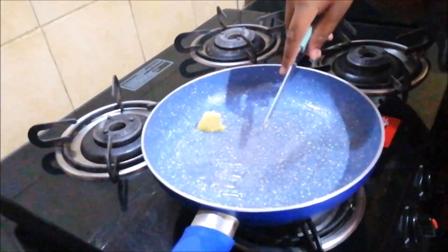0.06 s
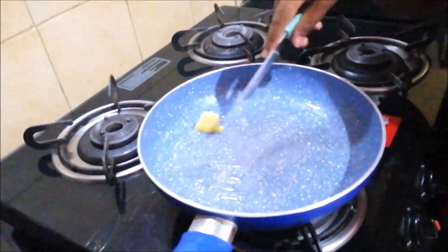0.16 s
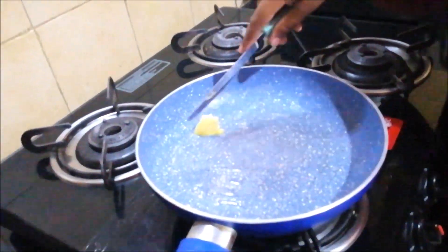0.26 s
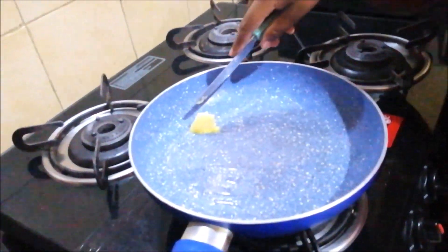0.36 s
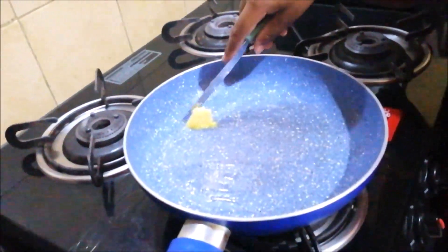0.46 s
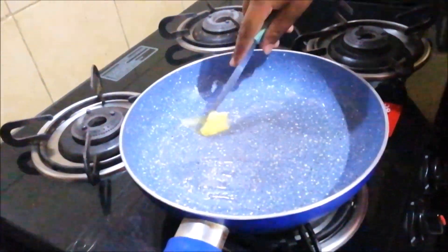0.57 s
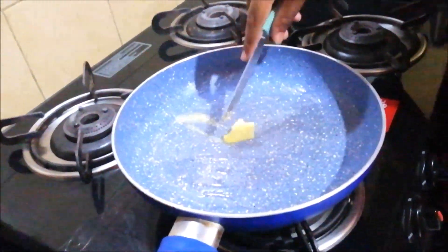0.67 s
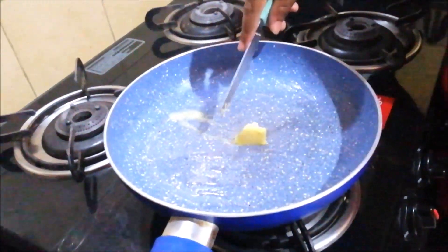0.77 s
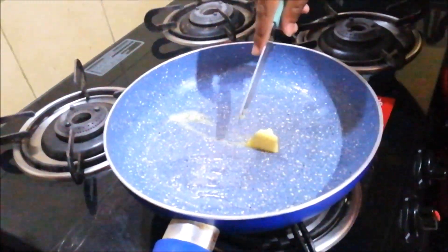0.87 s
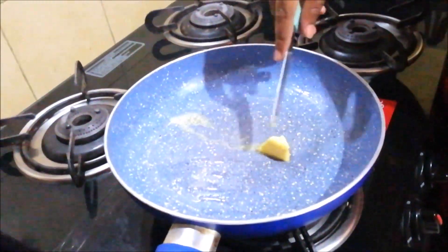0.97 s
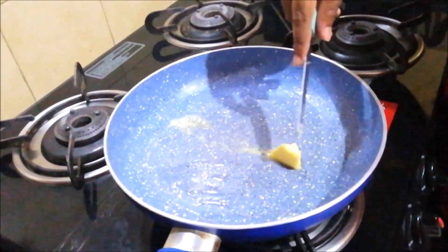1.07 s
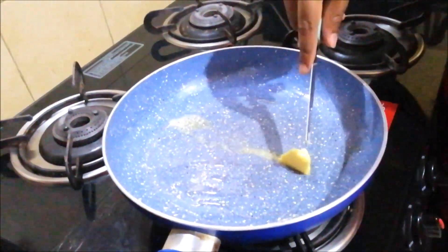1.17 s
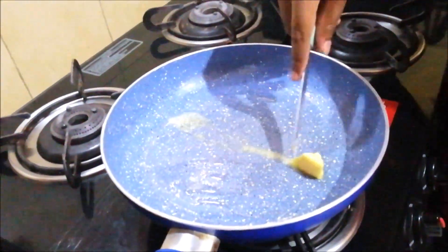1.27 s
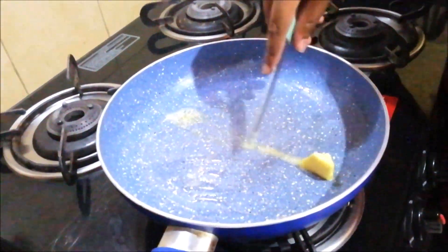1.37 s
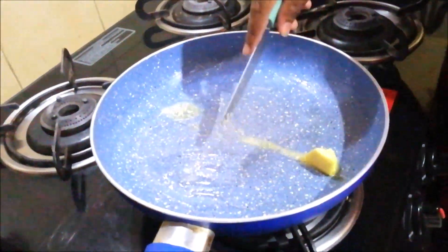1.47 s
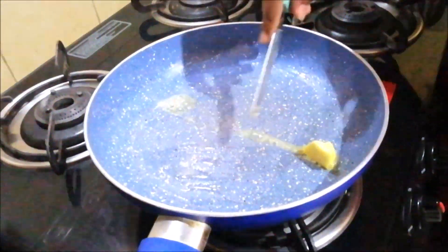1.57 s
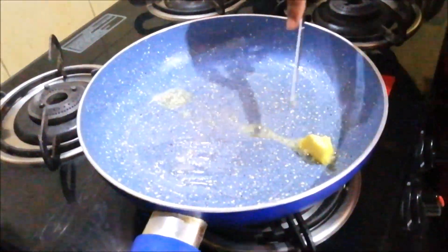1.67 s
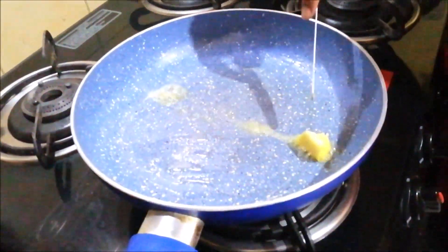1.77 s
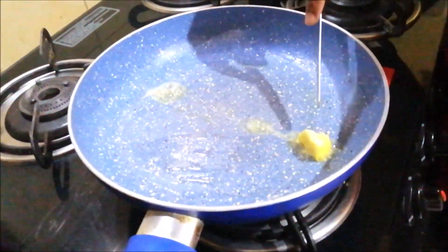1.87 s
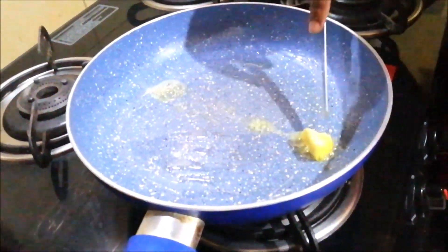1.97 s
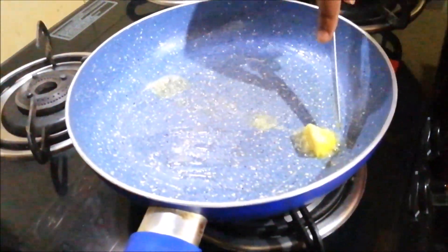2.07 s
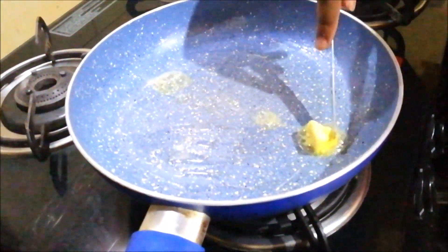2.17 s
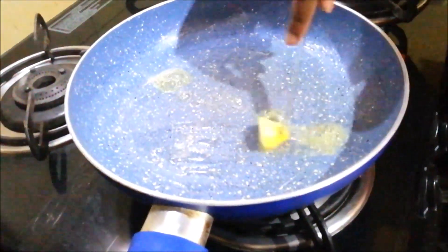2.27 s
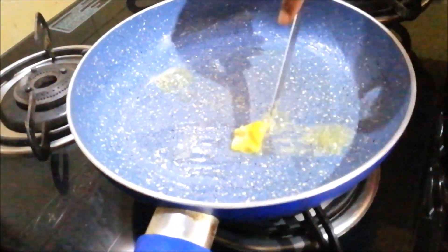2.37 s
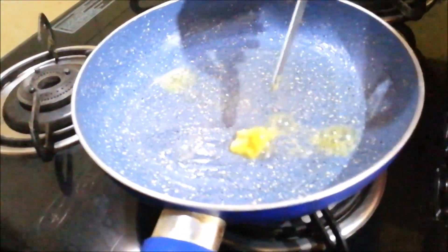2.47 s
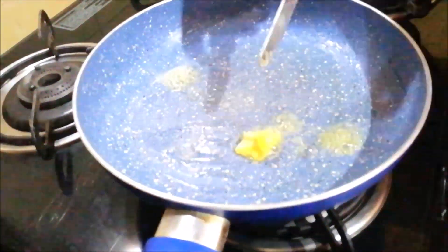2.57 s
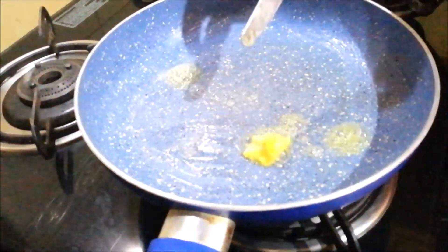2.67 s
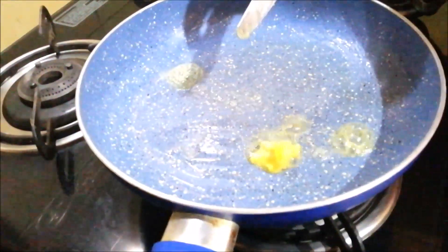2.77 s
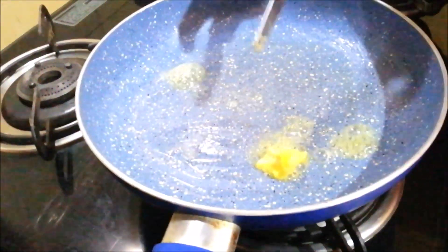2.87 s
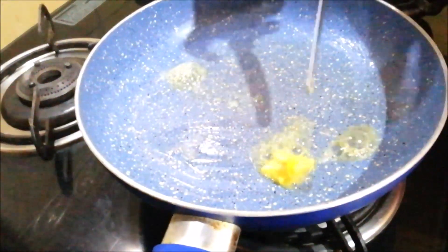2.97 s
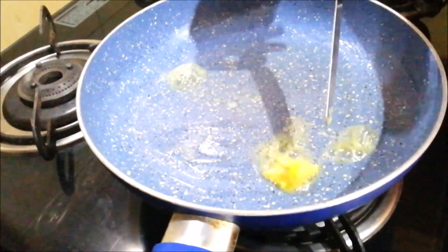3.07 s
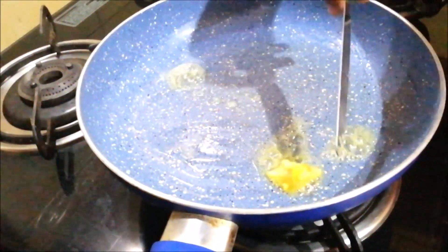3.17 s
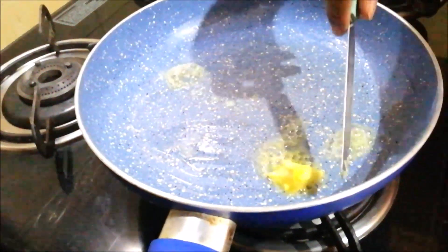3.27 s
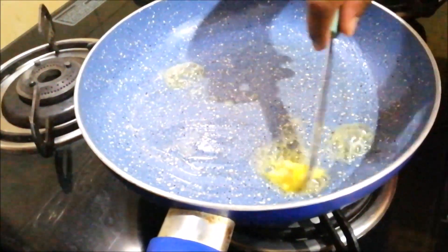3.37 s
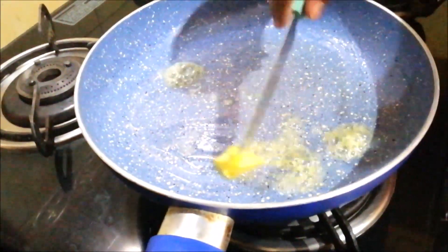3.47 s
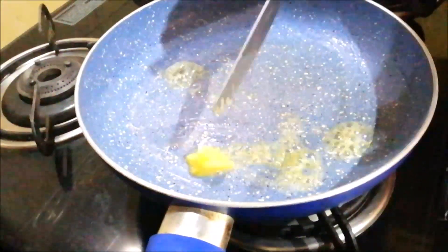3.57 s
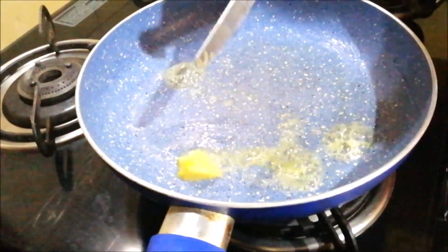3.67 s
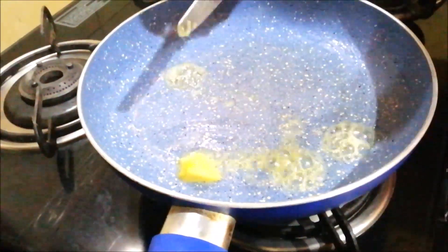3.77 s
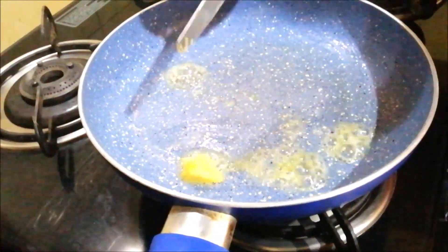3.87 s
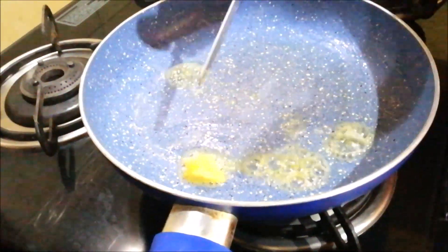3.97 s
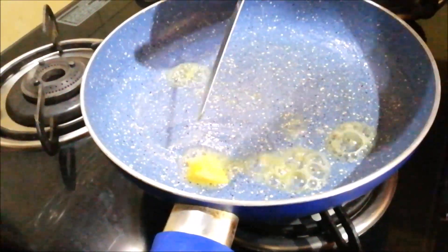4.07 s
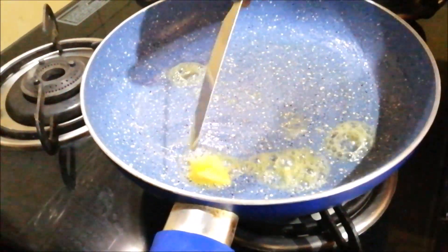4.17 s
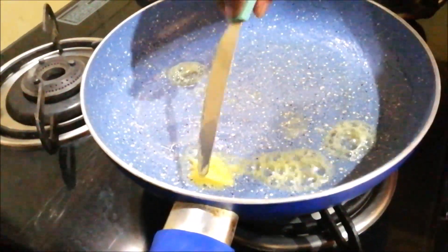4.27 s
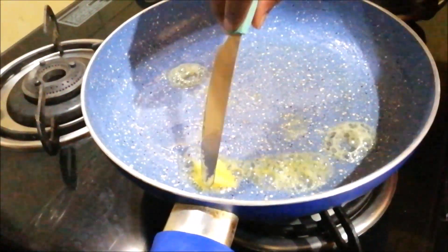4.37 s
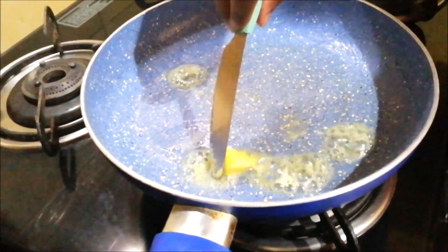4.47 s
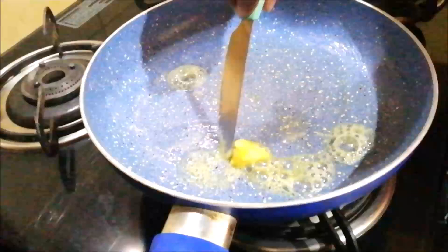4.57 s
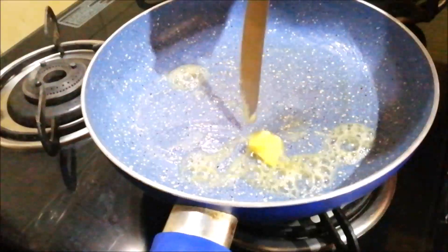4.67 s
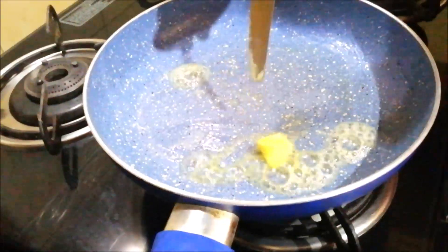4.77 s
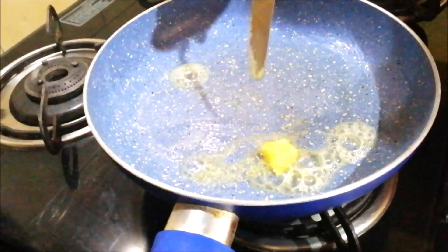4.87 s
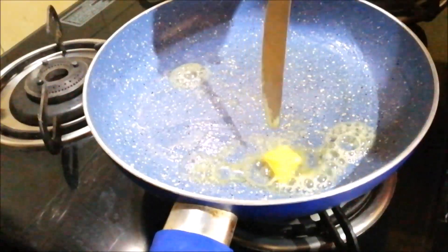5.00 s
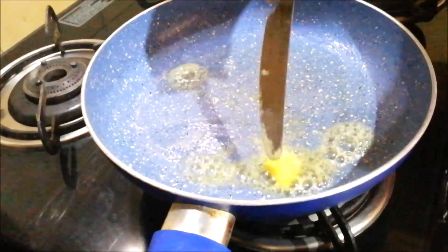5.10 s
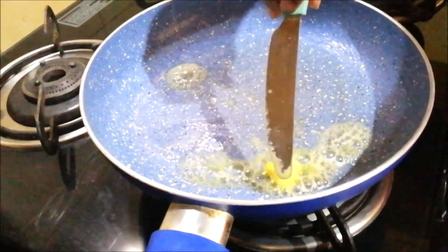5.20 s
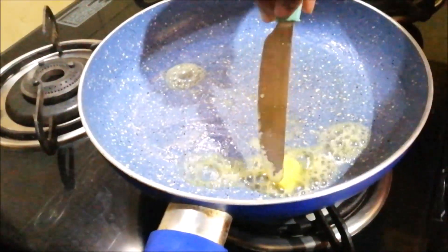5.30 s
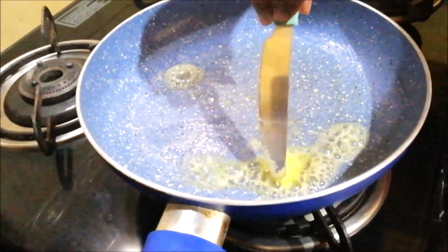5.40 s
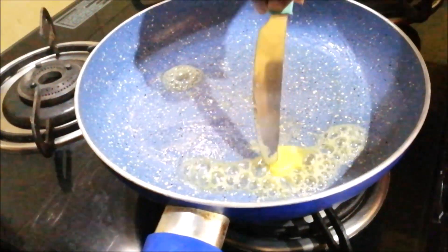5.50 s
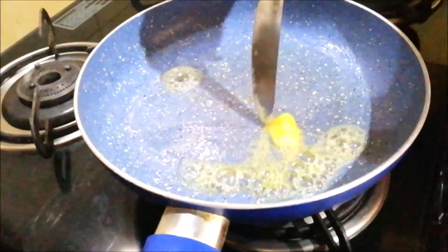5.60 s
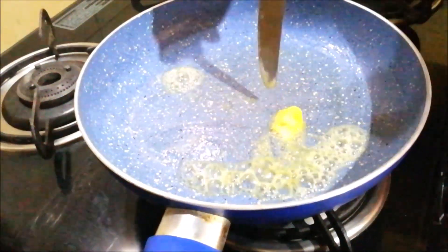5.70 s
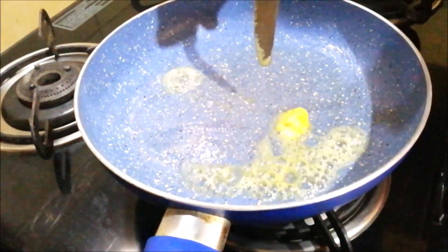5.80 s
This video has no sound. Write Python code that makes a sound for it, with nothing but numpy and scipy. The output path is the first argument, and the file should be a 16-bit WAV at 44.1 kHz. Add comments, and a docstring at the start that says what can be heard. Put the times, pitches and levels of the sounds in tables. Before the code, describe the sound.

A very close stereo perspective on a pan in a small tiled kitchen. From 0 to about 0.9 s there is mainly low rumble with a mains-like drone, faint hiss and a barely audible thin whine; light knife scuffs and a few tiny ticks show at 0.1-0.8 s. Around 0.9-1.1 s the knife drags roughly and knocks dully, and butter breaks into sizzle. From 1.1 s dense, fine, watery-bright crackling continues in uneven flurries, dotted with sharp irregular pops, a stronger one near 2.45 s. Dull pan knocks fall near 1.9, 2.8, 3.7 and 4.25 s, mostly buried in frying. Sizzle eases slightly around 3.6-4 s; a short, ringing scrape comes at 4.6 s. Near 5.05 s the frying surges, then the hardest snaps strike at 5.3 and 5.44 s. It relaxes somewhat but keeps crackling to the end, with short reflections from hard walls.

```python
"""Butter sizzling in a pan

A lump of butter is pushed with a knife across a hot pan on a kitchen stove, close to a two-port microphone.
Bursting steam bubbles are dense short rings; louder pops add a wide crack, two rings and a spray.
The knife drags as rough chatter and knocks as dull noise bursts, both exciting the modes of the pan.
Shaped noise rumbles and hisses, a sine whines, and sparse decaying taps are the tiled walls."""
import sys
import numpy as np
from scipy import signal
from scipy.io import wavfile
from scipy.ndimage import uniform_filter1d

SR = 44100
rng = np.random.default_rng(int(sys.argv[2]) if len(sys.argv) > 2 else 0)


def inscribe(sig):
    """Save sig as 16-bit PCM at rate SR to the path in sys.argv[1].

    A 1-D sig is mono; a 2-D sig holds one channel per row.
    Samples are clipped to [-1, 1] before scaling.
    """
    pcm = np.round(np.clip(np.atleast_2d(sig).T, -1, 1) * 32767)
    wavfile.write(sys.argv[1], SR, pcm.astype(np.int16))


N = 257676

# port balance of sizzle and pan: (frequency [Hz], left minus right [dB])
LEFTNESS = [(700, 0), (1290, 5), (2380, 8.5), (4400, -1.5), (8120, 7.5), (12000, -0.5)]
# size groups of bubbles, large to small: (lowest [Hz], highest [Hz])
PARTS_HZ = [(1200, 3500), (3500, 8000), (8000, 16400)]
LEFT_LAG_S = 0.00026  # low sound reaches the left port late and reversed


def amp(db):
    """Amplitude ratio of a level in dB."""
    return 10 ** (np.asarray(db) / 20)


def evened(x):
    """Scales to an RMS of 1 over all ports."""
    return x / np.sqrt(np.mean(x ** 2) + 1e-20)


def read(points, hz):
    """Reads a (Hz, value) table on a log frequency axis."""
    f, value = np.transpose(points)
    return np.interp(np.log(hz + 1), np.log(f + 1), value)


def curve(rows, t):
    """Reads each column of a table over time in seconds."""
    s, *columns = np.transpose(rows)
    return [np.interp(t, s, c) for c in columns]


def add(mix, s, sound):
    """Adds a sound in place from s seconds, cut at the end of the mix."""
    part = mix[:, round(s * SR):][:, :sound.shape[1]]
    part += sound[:, :part.shape[1]]


def colour(db, size=2048):
    """Minimum-phase filter taps from gains in dB on the bins of a real FFT."""
    log_gain = np.log(amp(np.maximum(db, -100)))
    circle = np.concatenate([log_gain, log_gain[-2:0:-1]])
    spectrum = np.exp(np.conj(signal.hilbert(circle)))
    return np.fft.ifft(spectrum).real[:size // 2]


def resonate(x, hz, width_hz):
    """One-pole resonance of peak gain 1, its pitch fixed or following a curve."""
    turn = np.exp(2j * np.pi * np.cumsum(hz * np.ones(x.shape[-1])) / SR)
    r = np.exp(-np.pi * width_hz / SR)
    return 2 * (turn * signal.lfilter([1 - r], [1, -r], x / turn)).real


def wash(shape, patchy_db):
    """Noise of a given spectrum with random level patches; port likeness varies with frequency."""
    # (frequency [Hz], left-right correlation [-1 to 1])
    likeness = [(25, 0.89), (60, 1), (130, 0.98), (290, 0.68), (640, -0.66), (1400, 0.095)]
    frames, hz = N // 512 + 5, np.fft.rfftfreq(2048, 1 / SR)
    a, b, c, d, patches = rng.standard_normal((frames, 1025, 5)).T
    patches = evened(uniform_filter1d(uniform_filter1d(patches, 3, 0), 8, 1))
    same = np.clip(read(likeness, hz), -1, 1)[:, None]
    left = a + 1j * b
    right = same * left + np.sqrt(1 - same ** 2) * (c + 1j * d)
    z = np.array([left, right]) * amp(read(shape, hz)[:, None] + patchy_db * patches)
    return evened(signal.istft(z, nperseg=2048, noverlap=1536)[1][:, :N])


def at_ports(x):
    """Gives bursts the colour of the sizzle, tilted left or right by band."""
    # sizzle spectrum: (frequency [Hz], relative density [dB])
    sizzle_shape = [(350, -93), (600, -21), (876, -9), (1130, -15.5), (1350, -9), (1820, -6), (2000, -5.5),
                    (2350, -5.5), (2880, -5.5), (3670, -7.5), (5660, -4), (7320, -5), (8380, -5.5),
                    (11100, -0.5), (13000, -8.5), (15200, -20.5), (15900, -56.5)]
    hz = np.fft.rfftfreq(2048, 1 / SR)
    taps = np.array([colour(read(sizzle_shape, hz) + side * read(LEFTNESS, hz)) for side in (.5, -.5)])
    return signal.oaconvolve(x, taps, axes=1)[:, :x.shape[1]]


def fizz(per_s=5200, spread_db=2.0, clump_db=4.0, cycles=1.43, count=30):
    """Bubbles burst in loose clumps of like size, each a ring of few cycles; path lags vary with size."""
    # mean level before flurries, of the port average if the ports are unlike:
    # (time [s], large bubbles [dB], middle bubbles [dB], small bubbles [dB])
    bubbling = [(0, -72, -68.5, -66), (.26, -76, -101, -79.5), (.69, -75, -77, -76), (.73, -67, -68, -66),
                (.82, -65, -68, -66), (.88, -60, -62, -59), (.96, -54, -55, -53), (1.02, -47.5, -46.5, -52),
                (1.14, -54, -51, -49.5), (1.3, -53, -50, -46), (1.7, -50.5, -45.5, -50),
                (1.95, -45.5, -47, -47), (2.25, -55, -44, -47.5), (2.7, -51.5, -47, -45),
                (3.17, -50.5, -44.5, -50), (3.6, -56, -48, -48.5), (4, -56, -50, -53.5),
                (4.35, -47, -47, -52), (4.8, -63.5, -50, -52), (5.06, -40.5, -40, -40),
                (5.38, -46, -43.5, -40), (5.6, -54.5, -47.5, -50), (5.84, -51.5, -45, -45.5)]
    kind = (count * rng.random(N) ** .6).astype(int)  # small bubbles are the many
    clumps = uniform_filter1d(rng.standard_normal((count // 3, N)), 300)
    clumps = evened(uniform_filter1d(clumps, 300))
    clumps = evened(0.8 * clumps[0] + clumps)[kind // 3, np.arange(N)]  # partly shared by all sizes
    strength = amp(spread_db * np.minimum(rng.exponential(1, N), 5) + clump_db * clumps)
    strength *= rng.choice([-1, 1], N) * (rng.random(N) < per_s / SR)
    groups = np.zeros((3, 2, N))
    for k, hz in enumerate(np.geomspace(1100, 15000, count)):
        r = np.exp(-hz / cycles / SR)
        group = sum(hz > top for _, top in PARTS_HZ)
        poles = [1, -2 * r * np.cos(2 * np.pi * hz / SR), r ** 2]
        train = signal.lfilter([hz ** 2], poles, strength * (kind == k))
        lag = round(LEFT_LAG_S * SR) * (group == 0) + rng.integers(-4, 7)
        groups[group] += [np.roll(train, lag), train if group else -train]
    # each size group has its own flurries
    swells = uniform_filter1d(uniform_filter1d(rng.standard_normal((3, N)), 900), 900)
    levels_db = curve(bubbling, np.arange(N) / SR) + 2.4 * evened(swells)
    return sum(amp(db) * evened(at_ports(g)) * np.sqrt(2) for g, db in zip(groups, levels_db))


def rumble():
    """Low kitchen rumble: broad noise plus droning bands resonated out of it."""
    # spectrum: (frequency [Hz], relative density [dB])
    rumble_shape = [(8.8, -38), (15, 5.5), (53, -18.5), (129, -6.5), (227, -13), (280, -17.5), (345, -16),
                    (507, -25.5), (700, -24.5), (910, -61), (1540, -120)]
    # RMS over both ports: (time [s], level [dB])
    rumble_level = [(0.0, -56), (0.23, -53), (0.78, -56.5), (1.02, -50), (2.0, -49), (3.12, -51.5),
                    (3.48, -48.5), (3.92, -50), (4.36, -49), (5.19, -52), (5.35, -53), (5.84, -49)]
    # droning bands: (centre [Hz], width [Hz], level relative to the broad noise [dB])
    hum_bands = [(24, 25, -13), (63, 10, -4.5), (100.43, 2.5, -1), (141, 14, -3), (217.6, 27, -7)]
    broad = wash(rumble_shape, patchy_db=3.0)
    drone = sum(amp(db) * evened(resonate(broad, hz, width_hz)) for hz, width_hz, db in hum_bands)
    return amp(curve(rumble_level, np.arange(N) / SR)[0]) * evened(broad + drone)


def hiss(level_db=-73.5):
    """Quiet kitchen hiss: shaped noise, levelled as the average of unlike ports."""
    # (frequency [Hz], relative density [dB])
    air_shape = [(290, -48), (500, -8), (529, 2), (675, -26), (848, -2.5), (1150, -6.5), (1810, -7),
                 (3300, -20), (9700, -19), (11000, -23), (12300, -33), (15200, -34), (15900, -60)]
    return amp(level_db) * np.sqrt(2) * wash(air_shape, patchy_db=1.0)


def whine(hz=850, peak_db=-72):
    """A thin steady sine that reaches the ports nearly opposed."""
    phases_rad = np.array([[0], [2.4]])
    return amp(peak_db) * np.sin(2 * np.pi * hz * np.arange(N) / SR + phases_rad)


def ring_pan(force):
    """The force sets the modes of the pan ringing; its low modes reach the two ports opposed."""
    # (mode [Hz], relative level [dB], t60 [s])
    modes = [(465, -6, 0.091), (735, -0.5, 0.48), (863, 0, 0.095), (1228, 12, 0.15), (1315, 13, 0.09),
             (1417, 13.5, 0.09), (2147, 20, 0.11), (2325, 11, 0.05), (2587, 8, 0.1), (3120, 8, 0.07),
             (3810, 18, .08)]
    out = np.zeros_like(force)
    for hz, db, t60_s in modes:
        heard = force if hz > 1100 else force[0] * np.array([[1], [-.7]])
        port_db = db + read(LEFTNESS, hz) * np.array([[.5], [-.5]])
        ring = resonate(heard, hz, np.log(1000) / np.pi / t60_s)
        out += amp(port_db) * ring * np.sqrt(t60_s)
    return out


def knife_drags(chatter_width=0.27, scuff_width=6.3, fall_s=0.038):
    """Rough chatter of band noise, part ringing the pan and part a plain scuff."""
    # level before the pressure envelope, of the port average if the ports are unlike:
    # (start [s], length [s], pressing in [s], level [dB], chatter centre [Hz], ringing share [0-1])
    drag_rows = [(0.083, 0.15, 0.006, -66, 2400, 0.3), (0.159, 0.095, 0.0091, -60.5, 2650, 0.14),
                 (.474, 0.083, 0.012, -64.5, 2460, 0.1), (0.705, 0.26, 0.1, -60, 2750, 0.1),
                 (0.93, .11, 0.05, -53, 1160, 0.44), (1.025, 0.1, 0.035, -47, 1200, 0.7),
                 (2.032, 0.18, 0.0097, -54.5, 1050, 0.6), (3.778, 0.53, 0.0097, -60.5, 745, 1),
                 (4.25, 0.11, 0.0089, -56.5, 825, 0.5), (4.569, 0.065, 0.004, -41, 2000, 1),
                 (4.605, 0.098, 0.04, -40.5, 1800, 1)]
    out = np.zeros((2, N))
    for s, length_s, rise_s, db, hz, ring in drag_rows:
        t, ring = np.arange(0, length_s, 1 / SR), np.clip(ring, 0, 1)
        a, b = rng.standard_normal((2, len(t)))
        chatter = resonate(np.array([a, 0.25 * a + 0.62 * b]), hz, chatter_width * hz)
        scuff = resonate(chatter, hz, scuff_width * hz)
        drag = evened(ring * evened(ring_pan(chatter)) + (1 - ring) * evened(scuff))
        press = np.minimum(np.minimum(t / rise_s, (length_s - t) / fall_s), 1)  # fall: lifting off
        add(out, s, amp(db) * np.sqrt(2) * press ** 2 * drag)
    return out


def pops(click_db=7, wait_s=.0005, crack_s=.0005, spray_s=.005, spray_db=-10, push_s=0.0014, push_db=-17,
         shared=0.2, low_width=0.7, bright_width=.35, sag=.1, peak_lag_s=.0004):
    """A large bubble strains and bursts with a wide crack and two short rings; droplets trail after it."""
    # part peaks at the louder port:
    # (peak time [s], low ring [Hz], its level [dB], bright ring [Hz], its level [dB], wide crack [dB])
    pop_rows = [(0.2109, 2450, -42, 10940, -49, -35), (0.2302, 2060, -56.0, 11410, -46, -50.0),
                (0.5312, 2540, -53, 10900, -51, -55.0), (0.731, 3110, -48.0, 10700, -45, -42),
                (0.8433, 2420, -50.0, 8700, -35.5, -47), (0.8487, 2470, -48, 9570, -29, -45.5),
                (0.8868, 2580, -38, 11330, -32.5, -29), (1.064, 1510, -37, 9900, -25.0, -35.0),
                (1.1313, 2270, -25.5, 4200, -16, -15), (1.2425, 2330, -26.5, 11600, -22.5, -12.5),
                (1.3002, 2270, -22.5, 11080, -38, -15.5), (1.4332, 2240, -26, 7800, -23, -17),
                (1.4416, 3200, -19, 11200, -24, -25), (1.462, 2020, -27, 7100, -22, -16),
                (1.5274, 2900, -30, 10220, -23, -31), (1.5734, 1830, -27, 10970, -26, -22),
                (1.6094, 2170, -24.5, 5300, -19, -26.0), (1.655, 2420, -34, 7570, -26.5, -33.5),
                (1.7272, 2270, -34, 5200, -22.5, -34), (1.751, 3070, -25, 5250, -25, -23),
                (1.8862, 2430, -27.5, 5420, -15.5, -31.0), (1.9376, 1870, -14, 4500, -24, -24),
                (2.074, 2550, -42, 11300, -20, -42), (2.1304, 2410, -27, 11400, -19, -27),
                (2.15, 2190, -29, 6060, -21, -26), (2.2199, 1930, -39, 9700, -22.5, -15),
                (2.331, 2550, -30, 7100, -25.5, -23), (2.3847, 1980, -41, 10800, -19.5, -34),
                (2.411, 2190, -33, 5540, -21, -32), (2.4374, 2230, -25.0, 6400, -18, -17.5),
                (2.4549, 2200, -7.5, 3540, -26, -19), (2.5242, 2220, -25, 11800, -21.5, -14.5),
                (2.6148, 2170, -25.5, 6000, -18, -22), (2.633, 2420, -25, 9380, -18.5, -20.5),
                (2.689, 1980, -34, 9500, -20.5, -30.5), (2.765, 2240, -45, 10200, -19, -30),
                (2.7813, 2350, -21.5, 4680, -18.5, -25), (2.877, 2970, -41, 11120, -25, -29),
                (2.9054, 2240, -26.5, 7150, -17.5, -23.0), (2.9126, 2520, -28, 5030, -18, -19),
                (2.927, 3010, -37, 7330, -24, -18), (2.9717, 2090, -18, 10400, -30, -21.5),
                (2.9921, 2240, -27, 6400, -20, -20), (3.0141, 2380, -19.5, 11610, -29, -21),
                (3.1022, 2110, -34.0, 9300, -18.5, -30.5), (3.1111, 2970, -24, 7210, -15, -14),
                (3.2406, 3080, -34, 5800, -19, -21), (3.2613, 2900, -24, 4600, -16.5, -35),
                (3.286, 2670, -33, 5100, -21.5, -25.5), (3.3082, 2370, -34, 10380, -22, -29),
                (3.3205, 2310, -32, 5540, -24, -15.5), (3.4034, 2980, -25, 10730, -23.5, -24),
                (3.473, 3100, -41.0, 9560, -17.0, -26), (3.528, 2970, -30, 8500, -20.5, -18.5),
                (3.5581, 2030, -34.5, 6160, -28, -21.5), (3.7413, 2970, -21, 8700, -13, -24),
                (3.7473, 2050, -21, 11100, -13, -29), (3.8636, 2200, -23, 6490, -22.5, -21),
                (3.9129, 2960, -29.0, 9500, -15.5, -22.5), (3.92, 2570, -40, 9370, -24, -34),
                (3.9636, 2500, -25, 7600, -16, -23), (4.0287, 2440, -42, 9100, -24.0, -27),
                (4.1155, 2800, -15, 4900, -14.5, -13), (4.1591, 2250, -27, 6130, -19.5, -33),
                (4.178, 2210, -18, 5240, -27, -23.5), (4.2034, 2500, -21.5, 7300, -22, -28),
                (4.3329, 2820, -16.5, 9100, -22.5, -22), (4.388, 2250, -32, 8170, -25.5, -28.0),
                (4.4829, 2160, -42, 10430, -25, -32), (4.5202, 2550, -37, 7600, -25.0, -33),
                (4.538, 2500, -35, 3610, -32, -29), (4.728, 2220, -36, 5350, -27, -37.0),
                (4.7367, 2400, -29, 11100, -23, -23), (4.8088, 2570, -27, 4700, -25, -30),
                (4.8589, 2230, -21, 8750, -23, -26), (4.869, 2220, -22.5, 7180, -21.5, -21),
                (4.8984, 2240, -15, 5700, -20, -14.0), (4.9755, 2130, -19.5, 11610, -31, -29),
                (5.0011, 2240, -26, 5630, -30, -25), (5.0078, 2380, -19, 7400, -27, -13),
                (5.0517, 2200, -10.5, 5640, -19, -19.5), (5.0682, 2280, -15, 7240, -22, -18),
                (5.1331, 2260, -14, 5620, -23, -18), (5.169, 2940, -16, 7580, -16, -22.5),
                (5.1979, 2160, -18, 10700, -26, -39), (5.2954, 2900, -8.5, 11600, -11, -6.5),
                (5.2995, 1900, -29, 9350, -19.0, -18), (5.3577, 2280, -21.0, 7260, -29, -24),
                (5.4363, 2330, -3.0, 7650, -12.5, -7), (5.5898, 2230, -14, 8700, -13.5, -18.5),
                (5.6858, 3030, -41, 9900, -15.0, -30.5), (5.8026, 2860, -29.5, 11000, -22, -25),
                (5.8125, 1880, -18.0, 5930, -23, -19)]
    out, age = np.zeros((2, N)), np.arange(1400) / SR - wait_s
    after = np.maximum(age, 0)
    shape = np.exp(-after / crack_s) + amp(spray_db) * np.exp(-after / spray_s)
    shape *= np.exp(np.minimum(age, 0) / (0.5 * wait_s))  # strain builds up
    push = amp(push_db) * after / push_s * np.exp(1 - after / push_s) * np.array([[1], [.6]])
    treble = signal.butter(2, PARTS_HZ[0][1], "highpass", fs=SR, output="sos")
    sinking = 1 - sag * (1 - np.exp(-after / spray_s))  # pitch sinks as the crater fills
    shared, lag = np.clip(shared, 0, 1), round(LEFT_LAG_S * SR)
    noises = rng.standard_normal((len(pop_rows), 2, 1400)) * shape
    for row, (a, b) in zip(pop_rows, noises):
        s, low_hz, low_db, bright_hz, bright_db, wide_db = row
        burst = np.array([a, shared * a + np.sqrt(1 - shared ** 2) * b])
        burst[[0, 1], shape.argmax() + rng.integers(0, 7, 2)] -= amp(click_db)  # click over the crack
        burst = at_ports(burst)
        low, bright = [resonate(resonate(burst, hz * sinking, width * hz), hz * sinking, width * hz)
                       for hz, width in ((low_hz, low_width), (bright_hz, bright_width))]
        low = np.array([np.roll(low[0], lag), -low[1]])
        parts = (low_db, low), (bright_db, bright), (wide_db, signal.sosfilt(treble, burst))
        pop = sum(amp(db) * part / abs(part).max() for db, part in parts)
        puff = amp(2 * wide_db) * push  # only the sharpest push a puff of air
        add(out, s - wait_s - peak_lag_s, pop + puff)
    return out


def knife_knocks(thud_s=0.021):
    """Short dull noise bursts that ring the pan."""
    # direct peak of the port average: (time [s], peak [dB], brightest [Hz])
    knock_rows = [(1.035, -37, 700), (1.936, -34.5, 886), (2.801, -47, 900), (3.662, -41.5, 820),
                  (4.251, -37, 610)]
    out, age = np.zeros((2, N)), np.arange(9000) / SR
    for s, db, hz in knock_rows:
        blow = resonate(rng.standard_normal((2, 9000)) * np.exp(-age / thud_s), hz, hz)
        knock = evened(ring_pan(blow)) + 14.0 * evened(blow)
        add(out, s, amp(db) * knock / abs(knock.mean(0)).max())
    return out


def kitchen(x, turns_per_s=1.3):
    """Tiled walls: three tails of sparse taps, decaying by band, blend in a steady rotation for even colour."""
    # (frequency [Hz], t60 [s])
    decay = [(500, 0.4), (2000, 0.28), (6000, 0.3), (14000, 0.12)]
    size = SR // 2
    taps = np.zeros((3, 2, size))
    at = np.arange(120, size - 20, 20) + rng.integers(0, 20, (3, 2, (size - 121) // 20))
    np.put_along_axis(taps, at, rng.choice([-1., 1.], at.shape), 2)
    hz, t, z = signal.stft(taps, SR, nperseg=256)
    z = z * amp(-60 * t / read(decay, hz)[:, None]) * (hz > 0)[:, None]
    tails = signal.istft(z, SR, nperseg=256)[1]
    turn = 2 * np.pi * (np.arange(N) / SR * turns_per_s + np.arange(3)[:, None, None] / 3)
    feeds = np.sqrt(2 / 3) * np.cos(turn) * x
    return signal.fftconvolve(feeds, tails / np.linalg.norm(tails[0, 0]), axes=2)[..., :N].sum(0)


def scene(sizzle_room_db=-9.5, bangs_room_db=-9):
    """Sums the direct sounds, what the walls return of them, and the background."""
    sizzle = fizz()
    background = rumble() + hiss() + whine()
    bangs = knife_drags() + pops() + knife_knocks()
    echoes = kitchen(amp(sizzle_room_db) * sizzle + amp(bangs_room_db) * bangs)
    return sizzle + bangs + echoes + background


def record(dry, edge_hz=16400):
    """The loudest pops round off in the preamplifier; then the band limit."""
    band_limit = signal.firwin(511, edge_hz, window=("kaiser", 9), fs=SR)
    return signal.oaconvolve(np.tanh(dry), band_limit[None], "same")


dry = scene()
out = record(dry)
inscribe(out)
```